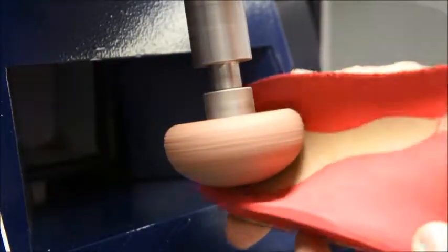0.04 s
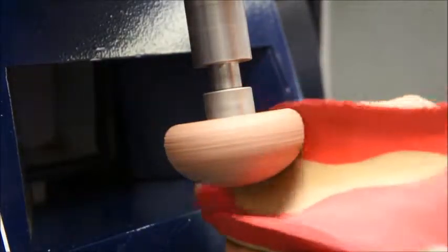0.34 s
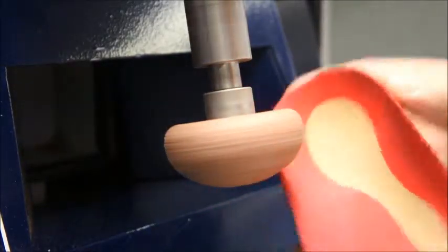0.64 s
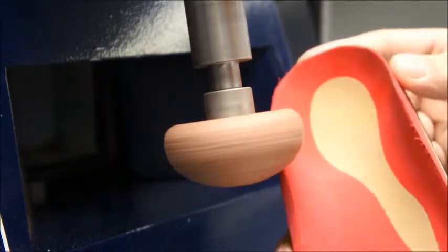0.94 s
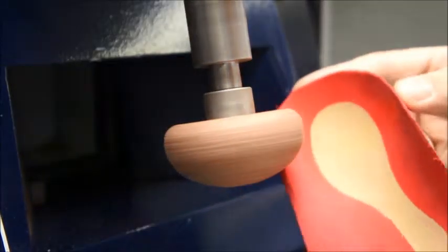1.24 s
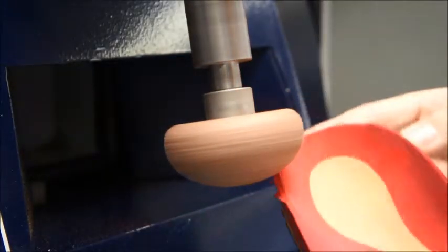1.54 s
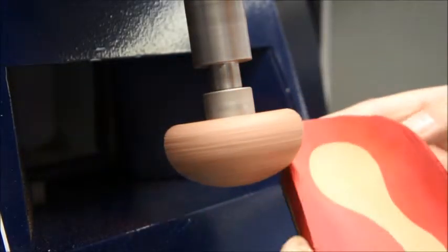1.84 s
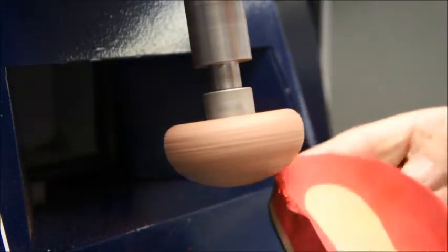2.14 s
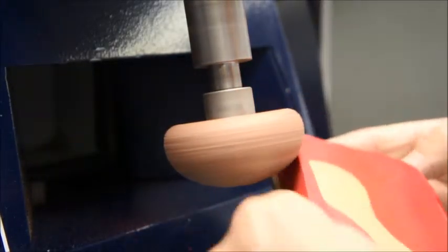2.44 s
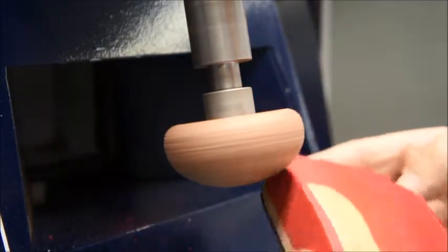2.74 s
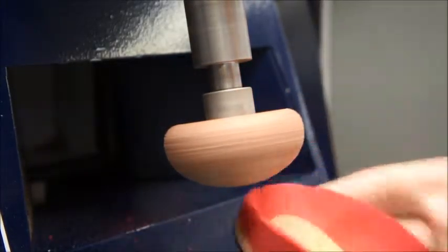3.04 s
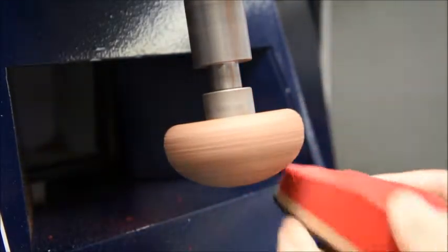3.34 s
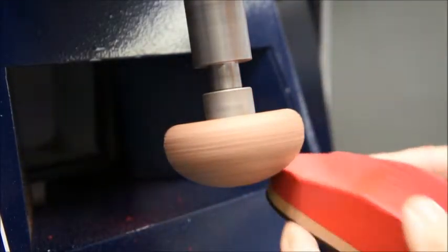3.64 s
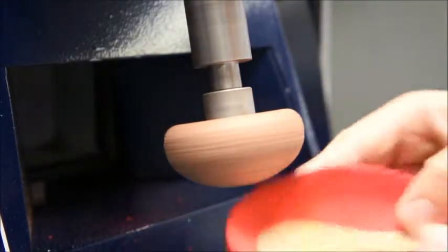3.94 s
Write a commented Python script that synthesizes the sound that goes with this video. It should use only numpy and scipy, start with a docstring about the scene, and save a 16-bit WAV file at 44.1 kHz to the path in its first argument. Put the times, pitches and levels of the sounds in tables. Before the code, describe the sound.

A spinning sanding head rasps against a shoe insole in bursts over a machine drone.

```python
"""A spinning sanding head grinds the edge of a shoe insole, close to the microphone.
Once a turn its high spots and grit strike the sole, which buzzes and rasps in forced vibration
under a throbbing abrasive scrape and hiss. The machine's steel hood reflects the grinding.
Behind it the motor and dust extractor drone, sinking while the grinding is loud."""
import sys
import numpy as np
from scipy import signal
from scipy.fft import rfft, irfft, next_fast_len
from scipy.io import wavfile
from scipy.ndimage import uniform_filter1d, minimum_filter1d, map_coordinates

SR = 44100
rng = np.random.default_rng(int(sys.argv[2]) if len(sys.argv) > 2 else 0)


def digitize_waveform(pressure):
    """Quantize a signal to 16-bit integers and store it at the path in sys.argv[1].

    Rows of a 2-D input are taken as channels; values are limited to [-1, 1].
    """
    field = np.atleast_2d(pressure).T
    bounded = np.clip(field, -1, 1)
    quanta = np.round(bounded * 32767).astype(np.int16)
    wavfile.write(sys.argv[1], SR, quanta)


N = 176400
TIME_S = np.arange(N) / SR
TURN_HZ = 49.65  # rotation rate of the head

# Left-right coherence of the grinding: frequency_hz, correlation
GRINDING_COHERENCE = [(300, 0.36), (1600, .95), (2600, 0.38), (4100, 0.79), (5500, 0.0042), (6900, 0.43),
                      (8200, -0.32), (9500, 0.3), (11000, 0.037)]


def grinding():
    """Sliding contact: the head drives the sole, its grit noise amplitude-modulated once a turn."""
    # Holds of the sole against the head: start_s, end_s, attack_s, release_s, bite_db, ring_hz,
    # sharpness, chatter_share, repeat_share, scrape_hz, peak_hz, peak_db, throb_db, reflection_gain,
    # pan_db, left_lag_s
    holds = [(-.05, .485, .01, .03, 0, 1870, 0.54, 0, 0.34, 3780, 10700, 8.5, 5, 0.23, -2.5, 0),
             (1.052, 1.477, .003, 0.23, 2, 1648, 0.99, 0.82, 0.61, 4200, 7100, 8, 0.3, 0.63, 0, .00011),
             (1.508, 1.767, 0.08, 0.094, -3, 1660, 0.6, 0.58, 0.47, 3950, 6470, 13, 1, 0, -4, .00012),
             (1.78, 2.224, 0.069, 0.03, -3, 1667, 0.93, 0.26, 0.27, 4360, 10900, 7, 1.5, 0.1, -3, .00013),
             (2.23, 2.505, 0.045, 0.016, 0, 1550, 0.88, 0.3, 0, 4670, 10200, 6, 0, 0, -2.5, .00013),
             (2.505, 2.713, 0.033, 0.0068, -2, 1420, 0.79, 0.43, 0.42, 3660, 9900, 1, 5.5, 0.26, -1.5, .00012),
             (2.71, 3.065, .003, 0.037, 3, 1490, 0.82, 0.05, 0.04, 4570, 9400, 4, 1, 0.2, -3, .00012),
             (3.604, 3.742, 0.01, 0.14, 4, 1490, 0.72, 0.2, 0.26, 5160, 8400, 0, 3.5, 0.36, -1.5, -.00004),
             (3.765, 4.044, 0.042, .01, -4, 1380, 0.52, 0.14, 0.38, 5000, 6730, 10, -1, 0.4, -2.5, -.00002)]
    # Relative strength of the grinding: time_s, rasp_db, scrape_db, hiss_db
    strength = [(0.0, -23, -25, -24), (0.07, -17.5, -46, -25.5), (0.15, -30, -39.5, -21.5),
                (0.32, -53.5, -37.5, -23.5), (0.46, -25.5, -64, -28), (0.51, -35, -42, -38),
                (1.02, -24, -36, -43), (1.06, -15, -29, -33.5), (1.11, -13, -27.5, -25.5),
                (1.4, -21, -26.5, -31.5), (1.65, -31, -29.5, -29), (1.69, -37, -30.5, -34.5),
                (1.83, -18.5, -26.5, -34), (1.92, -23.5, -32, -31), (2.06, -20, -25, -32),
                (2.18, -22.5, -24, -30), (2.26, -44, -32.5, -31.5), (2.34, -25.5, -30, -33),
                (2.47, -28, -27, -28.5), (2.56, -23.5, -29, -34), (2.73, -21.5, -31.5, -28.5),
                (2.82, -32, -27.5, -26), (3.02, -27, -29, -31), (3.09, -44, -33, -37),
                (3.52, -30, -37, -43), (3.6, -35, -38.5, -41), (3.63, -32, -33, -25),
                (4.0, -23.5, -30.5, -23.5)]
    rasp_db, scrape_db, hiss_db = curves(strength)
    bite_decay_s, throb_crest_turns = 0.054, 0.59
    blows = chatter()
    swell = np.cos(2 * np.pi * (TURN_HZ * TIME_S - throb_crest_turns))
    fine_grit = stereo(patchy(grit(repeat_share=0.24), depth_db=3), GRINDING_COHERENCE)
    sole, abrasive, to_hood = np.zeros((3, 2, N))
    for (start_s, end_s, attack_s, release_s, bite_db, ring_hz, sharpness, chatter_share, repeat_share,
         scrape_hz, peak_hz, peak_db, throb_db, reflection_gain, pan_db, left_lag_s) in holds:
        ramp = np.minimum((TIME_S - start_s) / attack_s, (end_s - TIME_S) / release_s)
        bite = amp(bite_db * np.exp(-np.abs(TIME_S - start_s) / bite_decay_s))  # at first touch
        touch = np.sqrt(np.clip(ramp + .5, 0, 1)) * bite
        throb = unit(amp(throb_db * swell))
        coarse_grit = throb * grit(repeat_share)
        force = blend(blows, coarse_grit, chatter_share)
        sole += touch * sole_resonance(force, ring_hz, sharpness)
        scrape = amp(scrape_db + 6.5) * abrasive_scrape(coarse_grit, scrape_hz)
        hiss = amp(hiss_db + 5) * abrasive_hiss(throb * fine_grit, peak_hz, peak_db)
        rub = touch * pan(pan_db) * arriving(scrape + hiss, left_lag_s)
        direct = rub / np.hypot(1, reflection_gain)  # the two paths share the power
        abrasive += direct
        to_hood += reflection_gain * direct
    rasp = stereo(amp(rasp_db + 2) * sole, GRINDING_COHERENCE)
    return arriving(rasp, left_lag_s=.00004) + abrasive + hood_reflection(to_hood)


def chatter():
    """Periodic impacts: each high spot strikes once a turn; pressure evens out their forces."""
    # High spots on the head: place_turns, light_touch_db, hard_press_db
    spots = [(.283, -17, -3), (.432, -19, -1), (.565, 0, 0), (.748, -12, -6), (.795, -5, -6)]
    # Load of the sole on the high spots: time_s, pressure_fraction
    pressure = [(1.1, 0.84), (1.3, 0.7), (1.42, 0), (1.65, 0.5), (1.85, 1), (2.2, 1), (2.5, 0)]
    jitter_s, scatter_db = .00002, 0.25
    place, light_db, hard_db = np.transpose(spots)
    turns = np.arange(int(N / SR * TURN_HZ))[:, None]
    jitter, scatter = rng.standard_normal((2, len(turns), len(spots)))
    strike_s = (turns + place) / TURN_HZ + jitter_s * jitter
    press = np.clip(np.interp(strike_s, *np.transpose(pressure)), 0, 1)
    force = amp(light_db + press * (hard_db - light_db))
    force = force / np.linalg.norm(force, axis=1, keepdims=True) * amp(-scatter_db * scatter)
    centres = strike_s[..., None] * SR
    taps = centres.astype(int) + np.arange(-8, 8)
    pulses = force[..., None] * np.sinc(taps - centres)  # band-limited impulses
    blows = np.bincount(np.clip(taps, 0, N).ravel(), pulses.ravel(), N)[:N]
    return unit(np.array([blows, np.zeros(N)]))  # mid only, no side


def grit(repeat_share):
    """Friction noise from uneven grains; partly periodic, as a share comes round every turn."""
    def grains(count, spread_db=4):
        noise = rng.standard_normal((2, count))
        sizes = np.repeat(rng.standard_normal(count // 12 + 1), 12)[:count]
        return unit(noise * amp(spread_db * sizes))

    period = round(SR / TURN_HZ)
    repeating = grains(period)[:, np.arange(N) % period]
    return blend(repeating, grains(N), repeat_share)


def sole_resonance(force, ring_hz, sharpness):
    """Forced vibration: the sole responds most near ring_hz; sharpness scales the contrast."""
    # Response of the sole: ratio_to_ring, gain_db
    response = [(.03, -72), (.25, -32), (.5, -24.5), (.575, -13.5), (.65, -14.5), (.76, -8.5), (.86, -0.5),
                (1.05, 3), (1.15, -3.5), (1.27, -14.5), (1.55, -10.5), (1.87, -15), (2.1, -24), (4, -44.5)]
    return unit(ringing(force, np.array(response) * [1, sharpness], ring_hz))


def abrasive_scrape(grains, scrape_hz):
    """Resonant filtering: coarse grit noise gathers at scrape_hz and the octave below."""
    # Spectrum of the scrape: ratio_to_scrape, level_db
    spectrum = [(.02, -9), (.2, -19.5), (.5, 6.5), (.62, 2), (.8, 2.5), (1, 6.5), (1.2, 2.5), (1.45, -4.5),
                (2.2, -21)]
    return unit(ringing(stereo(grains, GRINDING_COHERENCE), spectrum, scrape_hz))


def abrasive_hiss(grains, peak_hz, peak_db):
    """Broadband friction noise: fine grit fills the treble, with one narrow peak."""
    # Spectrum of the hiss: frequency_hz, level_db
    spectrum = [(2000, -34), (4500, -18), (6800, -2.5), (7700, -3), (8700, 1.5), (9700, 0), (11000, -4),
                (12000, -5.5), (12900, -26)]
    relative_half_width = 0.063

    def response(hz):
        detuning = (hz / peak_hz - 1) / relative_half_width
        return amp(along(spectrum, hz) + peak_db / (1 + detuning ** 2))

    return unit(filtered(grains, response))


def hood_reflection(x, delay_s=0.000992, drift_fraction=0.028):
    """Comb filtering: an echo off the hood, drifting as the hand moves, interferes with the direct sound."""
    departure = np.arange(N) - SR * delay_s * (1 + drift_fraction * wobble(3.13))
    return np.array([np.interp(departure, np.arange(N), side) for side in x])


def hood_reverberation(x, t60_s=0.14, onset_s=.002):
    """Reverberation: dense reflections in the steel hood decay exponentially."""
    t = np.arange(SR // 4) / SR
    tail = rng.standard_normal((2, len(t))) * amp(-60 * t / t60_s) * (t > onset_s)
    return signal.fftconvolve(x, tail / np.linalg.norm(tail[0]), axes=1)[:, :N]


def drone():
    """Flow noise excites the extractor's resonances under wavering motor and fan tones."""
    # Strength of the drone: time_s, gain_db
    strength = [(0, -21), (.37, -21.5), (.45, -17.5), (.7, -16.5), (1.045, -14), (1.075, -25),
                (1.17, -29.5), (1.28, -27), (1.55, -33.5), (1.7, -26), (2.2, -22), (2.47, -18), (2.57, -16),
                (2.68, -18), (3.05, -17.5), (3.25, -14), (3.6, -14), (3.9, -18), (4, -25.5)]
    # Spectrum of the air in the extractor: frequency_hz, level_db
    air_spectrum = [(25, -39), (40, -41), (62, -26.5), (80, -22), (100, -10), (145, -10), (200, 0),
                    (235, -0.5), (260, -7.5), (305, -3), (400, -16.5), (465, -8.5), (520, -15), (700, -8),
                    (780, -13), (890, -10.5), (1030, -20), (1230, -14), (1700, -21), (2600, -20.5),
                    (3500, -28), (7400, -35.5), (11000, -38.5), (12800, -55.5)]
    # Left-right coherence of that air: frequency_hz, correlation
    air_coherence = [(60, 0.96), (150, 1), (300, 0.83), (800, 0.63), (1400, 0.38), (2300, 0.19),
                     (4000, -0.46), (6400, 0.6), (8000, -0.3), (12000, 0.17)]
    # Motor and fan tones: pitch_hz, level_db
    partials = [(98, -19.5), (196, -13.5), (290.5, -13.5), (462, -24.5), (695, -19), (904, -19.5)]
    waver_db, wander_rad = 5, 0.73
    flow = filtered(rng.standard_normal((2, N)), lambda hz: amp(along(air_spectrum, hz)))
    air = amp(0.5) * unit(stereo(flow, air_coherence))
    tones = np.zeros(N)
    for pitch_hz, level_db in partials:
        amplitude = np.sqrt(2) * amp(level_db + waver_db * wobble(12))
        tones += amplitude * np.sin(2 * np.pi * pitch_hz * TIME_S + wander_rad * wobble(14))
    return amp(curves(strength)[0]) * (air + tones) * pan(db=-0.86)


def amp(db):
    """Decibels to amplitude ratio."""
    return 10 ** (np.asarray(db) / 20)


def unit(x):
    """Normalisation to rms 1."""
    return x / np.sqrt(np.mean(x ** 2) + 1e-20)


def along(points, hz):
    """Interpolation of (frequency, value) points on a log frequency axis."""
    frequencies, values = np.transpose(points)
    return np.interp(np.log(hz + 1e-9), np.log(frequencies), values)


def curves(rows):
    """Linear envelopes, one for each column after the time."""
    times, *columns = np.transpose(rows)
    return [np.interp(TIME_S, times, column) for column in columns]


def wobble(rate_hz):
    """Smooth random modulation with rate_hz knots a second."""
    knots = rng.standard_normal(int(N * rate_hz / SR) + 4)
    return map_coordinates(knots, [TIME_S * rate_hz])


def filtered(x, response):
    """Linear filtering: the spectrum times a complex frequency response."""
    size = next_fast_len(N + 8192)
    return irfft(rfft(x, size) * response(np.fft.rfftfreq(size, 1 / SR)), size)[..., :N]


def ringing(x, shape, hz, size=4096):
    """Minimum-phase resonance: x drives a body whose response is centred on hz."""
    magnitude = amp(along(shape, np.fft.rfftfreq(size, 1 / SR) / hz))
    cepstrum = irfft(np.log(magnitude))
    cepstrum[1:size // 2] *= 2  # folding makes the response causal
    cepstrum[size // 2 + 1:] = 0
    impulse_response = irfft(np.exp(rfft(cepstrum)))
    return signal.oaconvolve(x, impulse_response[None], axes=1)[:, :N]


def patchy(x, depth_db, bins=4, frames=60):
    """Spectral modulation: slow random patches of gain over frequency and time."""
    spectra = signal.stft(x, nperseg=512)[2]
    field = uniform_filter1d(rng.standard_normal(spectra.shape), bins, axis=1)
    field = uniform_filter1d(field, frames, axis=2)
    return signal.istft(spectra * amp(depth_db * unit(field)))[1][:, :N]


def blend(a, b, share):
    """Incoherent sum: a takes the given share of the power."""
    share = np.clip(share, 0, 1)
    return np.sqrt(share) * a + np.sqrt(1 - share) * b


def stereo(pair, coherence):
    """Partial coherence: two unrelated signals, weighted as mid and side, form left and right."""
    def weights(hz):
        angle = np.arccos(np.clip(along(coherence, hz), -1, 1)) / 2
        return np.array([np.cos(angle), np.sin(angle)])

    mid, side = filtered(pair, weights)
    return np.array([mid + side, mid - side])


def pan(db):
    """Level difference: gains that put the left db above the right."""
    return amp([[db / 2], [-db / 2]])


def arriving(x, left_lag_s):
    """Time difference: sound reaches the left left_lag_s after the right."""
    return filtered(x, lambda hz: np.exp(1j * np.pi * hz * left_lag_s * np.array([[-1], [1]])))


def scene():
    """Superposition of the grinding, its reverberation and the drone."""
    work = grinding()
    return work + amp(-10.5) * hood_reverberation(work) + drone()


def record(dry, ceiling=.95, hold_s=.004, top_hz=13000):
    """Peak limiting and band limiting: the gain dips at peaks, and nothing passes above top_hz."""
    hold = round(hold_s * SR)
    needed = ceiling / np.maximum(np.abs(dry).max(axis=0), ceiling)
    gain = uniform_filter1d(minimum_filter1d(needed, hold), hold)
    return filtered(dry * gain, lambda hz: hz < top_hz)


dry = scene()
out = record(dry)
digitize_waveform(out)
```